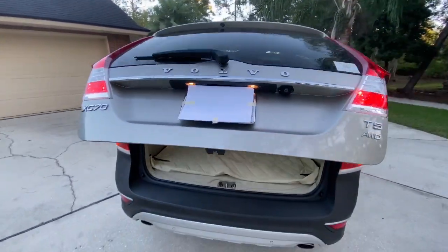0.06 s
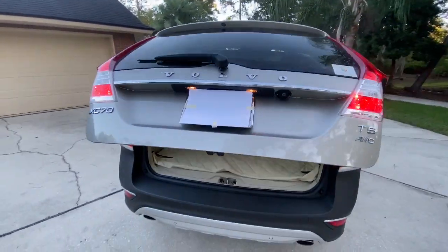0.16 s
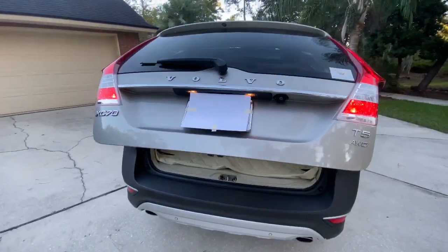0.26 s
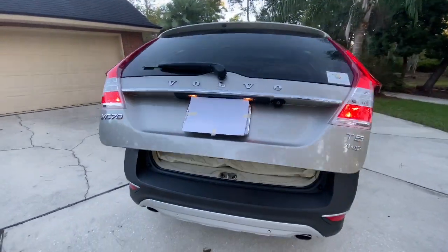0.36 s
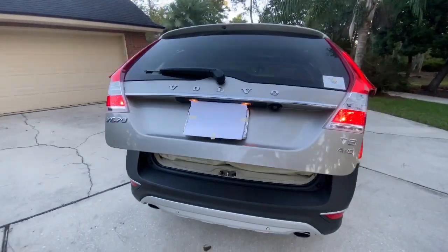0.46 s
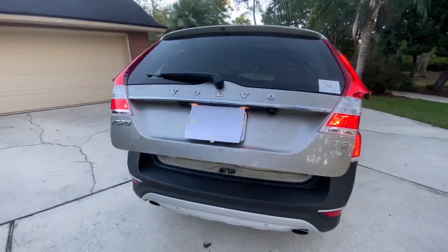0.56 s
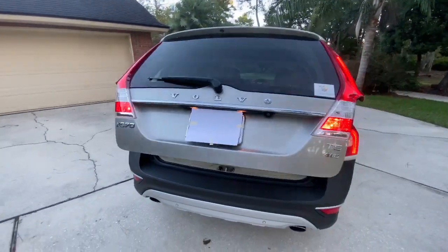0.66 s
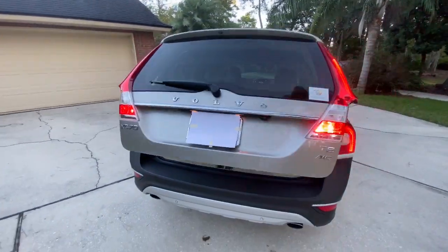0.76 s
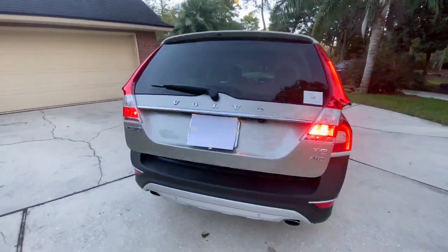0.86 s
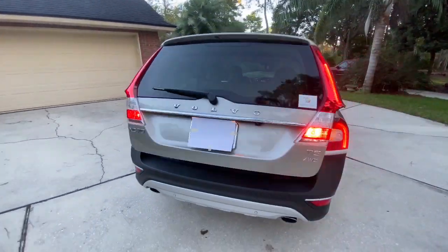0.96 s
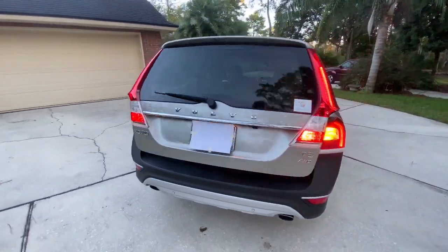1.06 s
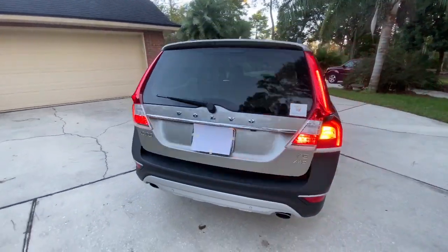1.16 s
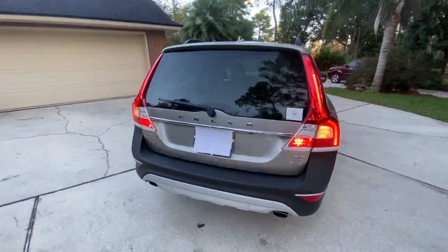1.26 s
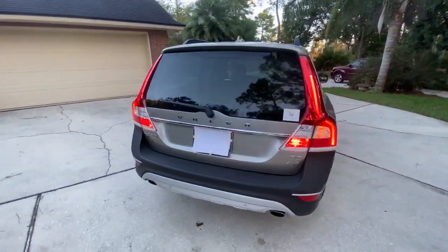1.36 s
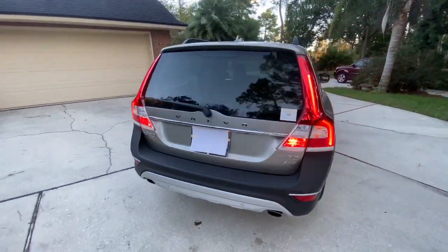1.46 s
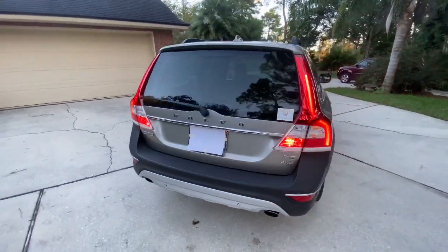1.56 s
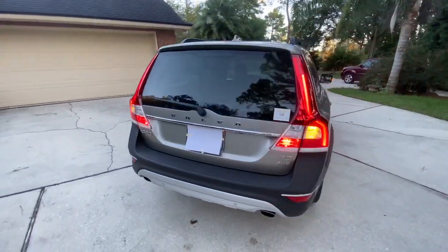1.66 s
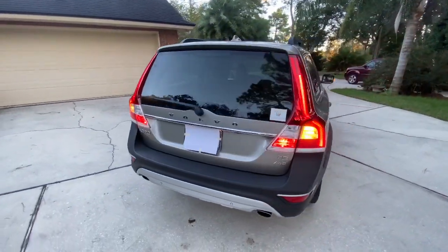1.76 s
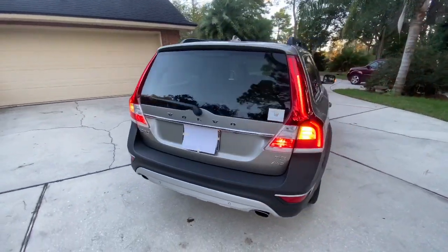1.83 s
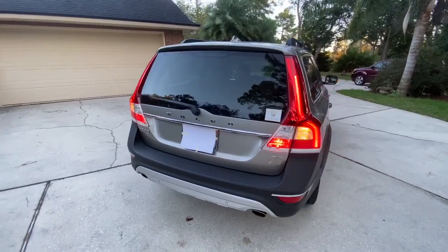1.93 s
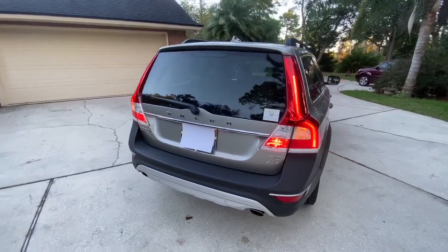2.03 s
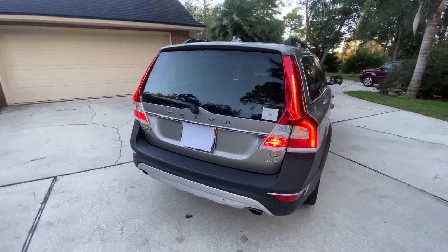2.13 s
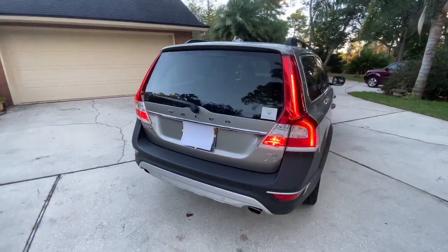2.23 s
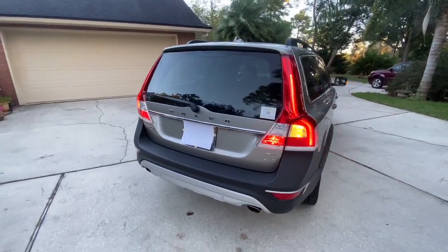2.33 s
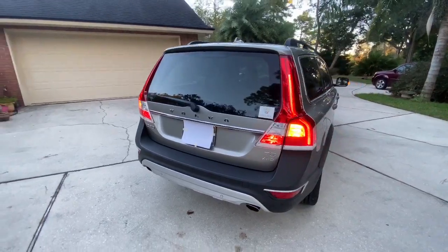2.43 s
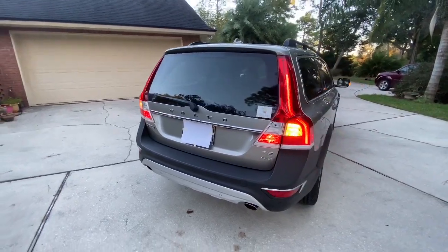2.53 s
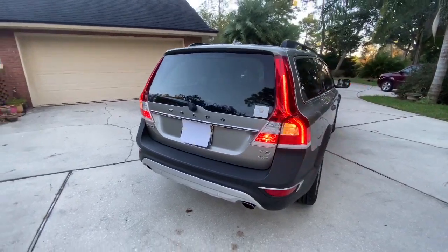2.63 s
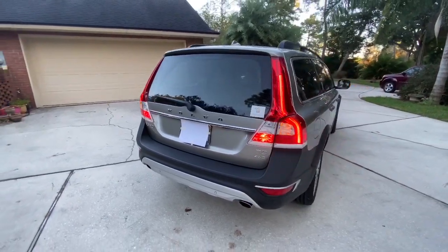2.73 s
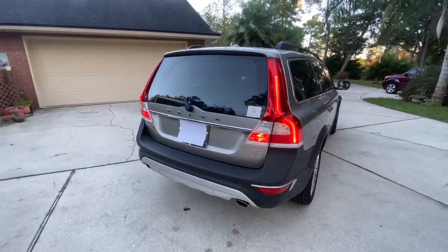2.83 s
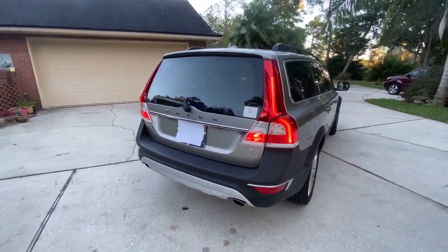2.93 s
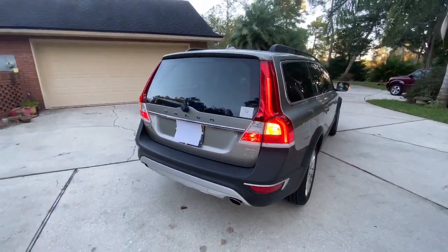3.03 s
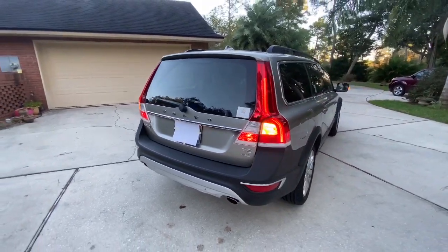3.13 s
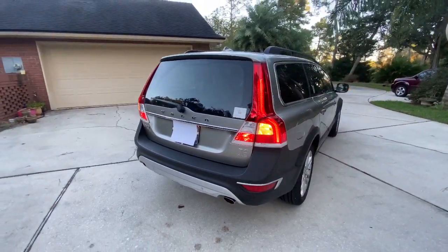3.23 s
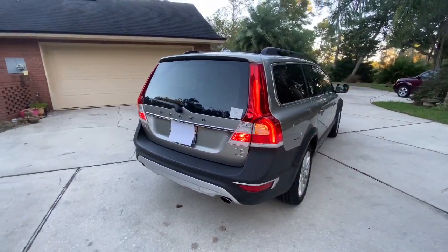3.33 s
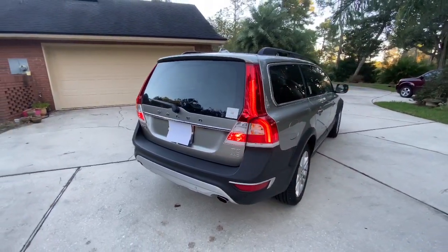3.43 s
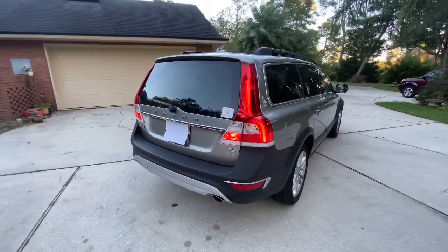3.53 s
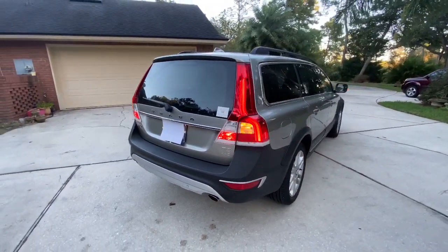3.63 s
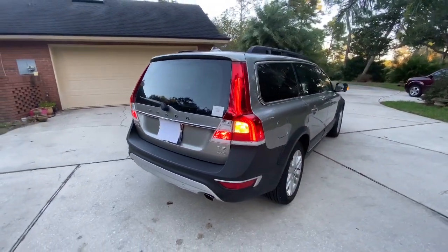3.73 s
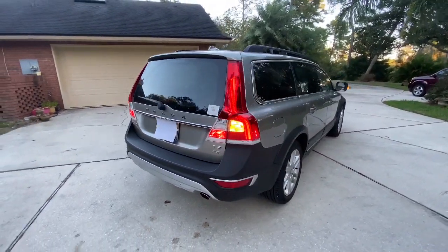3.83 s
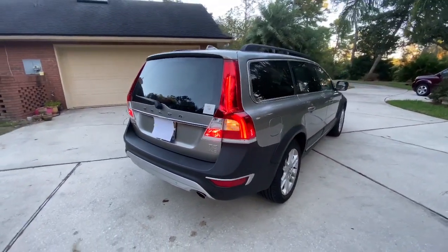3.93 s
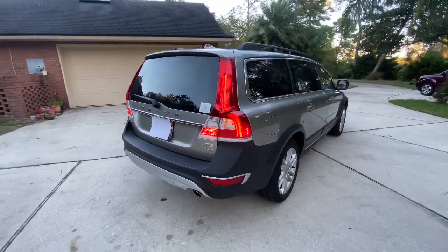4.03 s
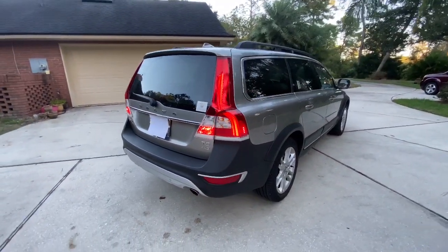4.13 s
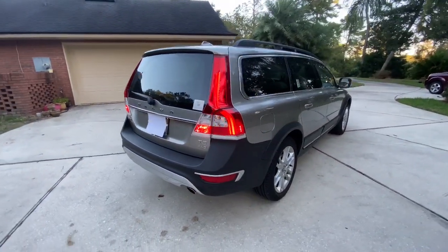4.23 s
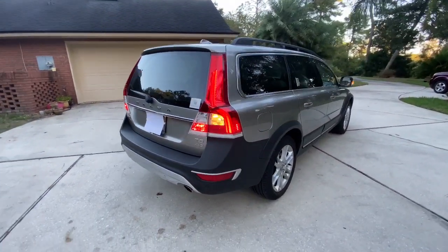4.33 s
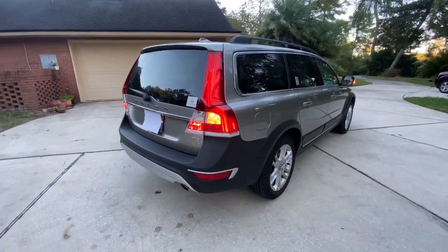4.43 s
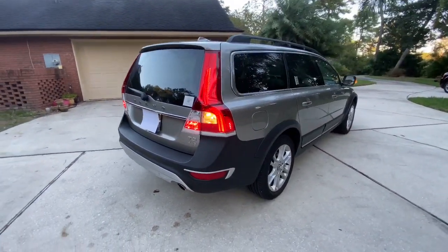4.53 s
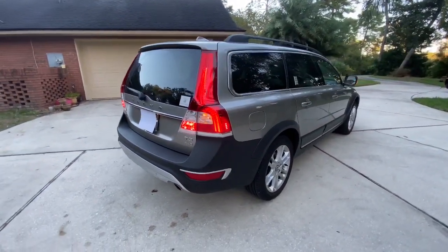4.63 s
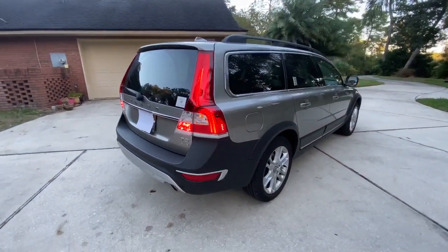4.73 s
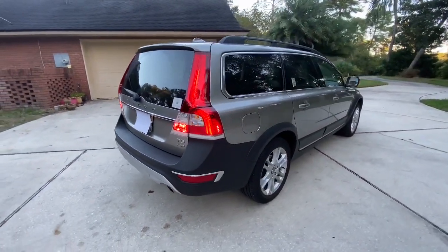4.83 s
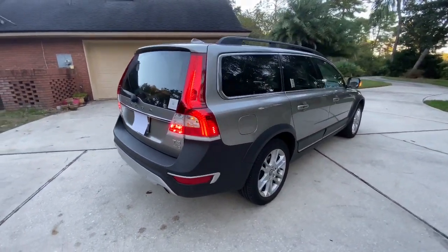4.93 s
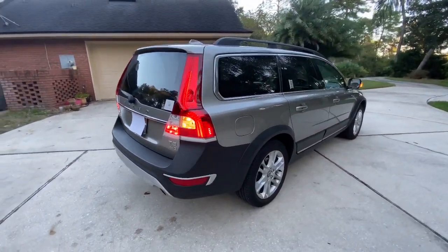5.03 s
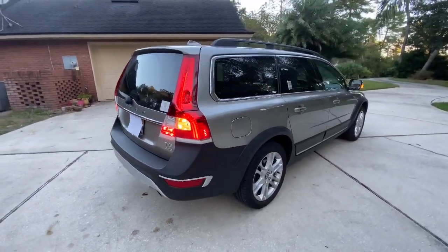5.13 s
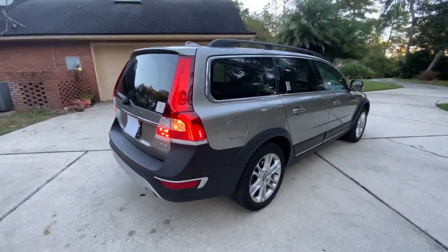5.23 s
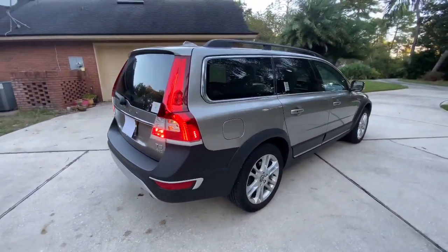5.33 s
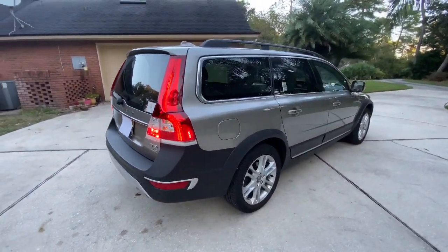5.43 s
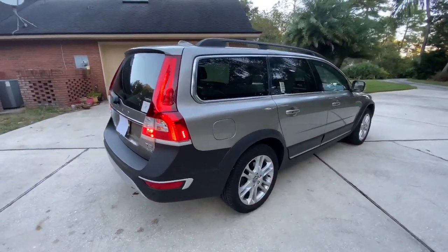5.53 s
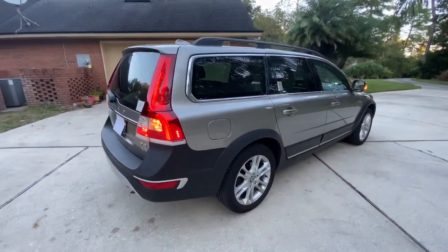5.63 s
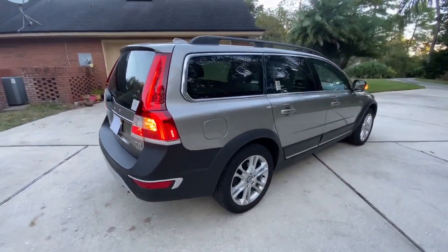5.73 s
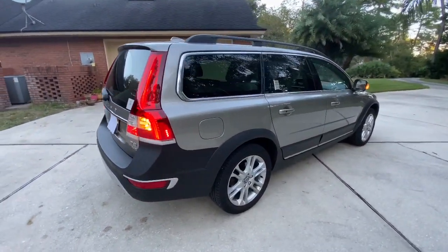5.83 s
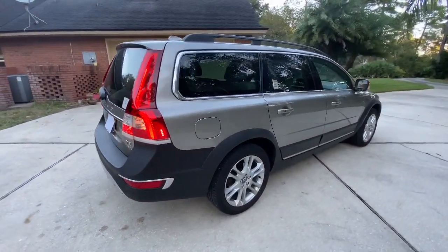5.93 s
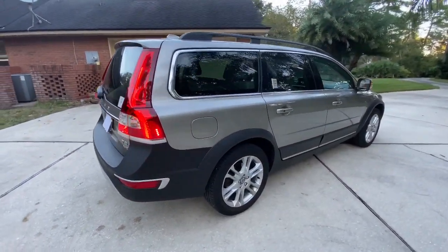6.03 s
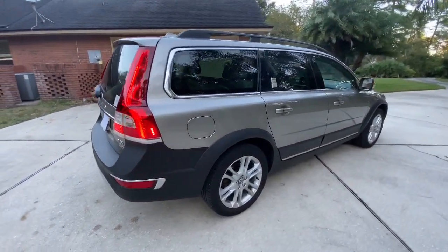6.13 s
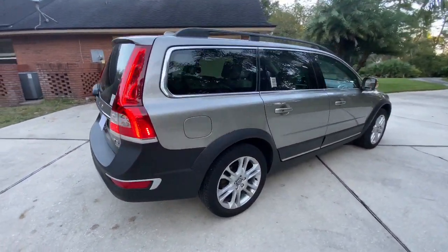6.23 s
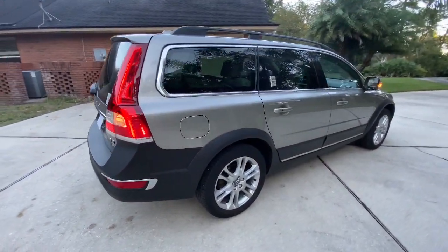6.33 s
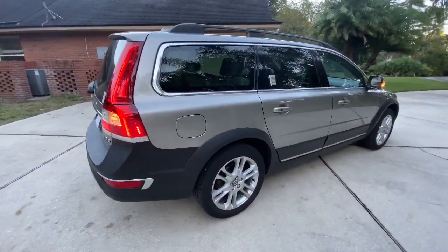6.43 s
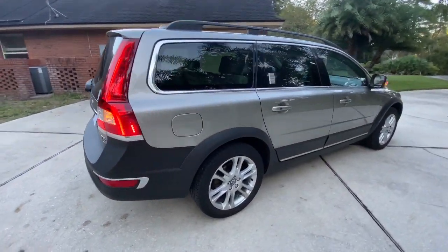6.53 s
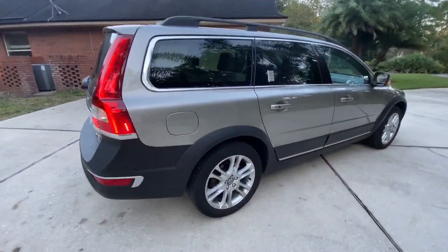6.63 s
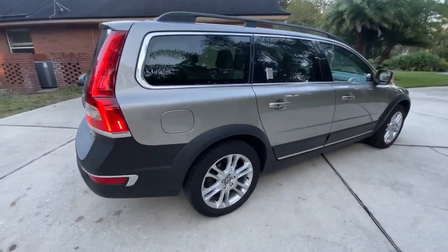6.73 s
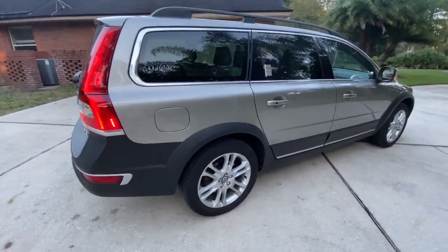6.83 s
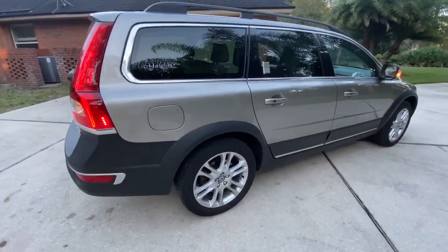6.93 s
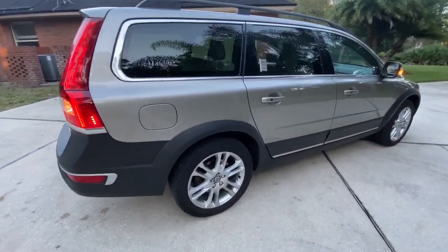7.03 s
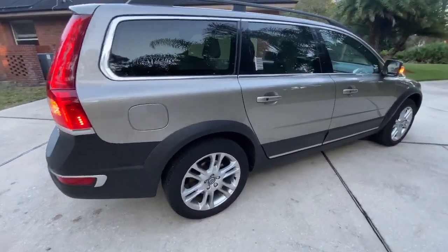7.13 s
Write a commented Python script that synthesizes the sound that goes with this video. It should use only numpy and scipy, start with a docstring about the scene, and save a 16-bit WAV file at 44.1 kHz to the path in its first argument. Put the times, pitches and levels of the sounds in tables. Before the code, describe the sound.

Motor whine rises faintly, a car's rear hatch thumps shut and rattles, then a low idle drone continues as engine hiss slowly grows brighter.

```python
"""A powered tailgate whines down and slams: motor and gear sines, then rattle noise and ringing modes.
Air trapped in the cabin booms at the slam and at the rebound.
The car idles on locked firing harmonics and shaped noise; along a walk round its flank the exhaust
drone shifts and the engine bay's hiss opens up. A thin electric whistle comes from the car.
Behind it all lies a hush of far traffic and leaves, with insects throbbing as bands of noise."""
import sys
import numpy as np
from scipy import signal
from scipy.fft import rfft, irfft
from scipy.io import wavfile

SR = 44100
rng = np.random.default_rng(int(sys.argv[2]) if len(sys.argv) > 2 else 0)


def dump_mix(stems):
    """Bounce the given channels to the path in sys.argv[1] as a 16-bit WAV at rate SR."""
    frames = np.atleast_2d(stems).T  # one column per channel
    limited = np.clip(frames, -1, 1)  # hard clip at full scale
    pcm = np.round(limited * 32767).astype(np.int16)
    wavfile.write(sys.argv[1], SR, pcm)


N = 316188
T = np.arange(N) / SR


def from_db(db):
    """Gain of a level in dB."""
    return 10 ** (np.asarray(db) / 20)


def rms_one(x):
    """Scale to unit power."""
    return x / np.sqrt(np.mean(x ** 2) + 1e-20)


def in_time(rows):
    """Columns of a table whose first column is time, as curves over the scene."""
    s, *columns = np.transpose(rows)
    return [np.interp(T, s, column) for column in columns]


def at_hz(points, hz):
    """Columns of a table whose first column is frequency, read on a log-frequency axis."""
    table_hz, *columns = np.transpose(points)
    return [np.interp(np.log(hz), np.log(table_hz), column) for column in columns]


def drift(rate_hz):
    """Slow random wander of spread 1: noise through two equal poles, made at every 40th sample."""
    r = np.exp(-2 * np.pi * rate_hz * 40 / SR)
    noise = rng.standard_normal(N // 40 + 4002)
    slow = signal.lfilter([1], [1, -2 * r, r * r], noise)[4000:]  # drop the filter's start-up
    slow = rms_one(slow - slow.mean())
    return np.interp(np.arange(N) / 40, np.arange(len(slow)), slow)


def ring(clicks, hz, t60_s):
    """A two-pole resonance: each unit click starts a dying sine of height 1."""
    r = from_db(-60 / (t60_s * SR))
    w = 2 * np.pi * hz / SR
    return signal.lfilter([0, np.sin(w)], [1, -2 * r * np.cos(w), r * r], clicks + 1e-18)


def tone(hz):
    """Sine of rms 1 at a fixed or moving pitch, from a random phase."""
    return np.sqrt(2) * np.sin(2 * np.pi * (np.cumsum(hz + 0 * T) / SR + rng.random()))


def whistling(hz, sway_hz):
    """Narrow noise of rms 1: a carrier whose two quadratures wander independently."""
    sway = drift(sway_hz), drift(sway_hz)
    phase = 2 * np.pi * np.cumsum(hz + 0 * T) / SR
    return rms_one(sway[0] * np.cos(phase) + sway[1] * np.sin(phase))


def port_noise(spectrum, ports, size=N):
    """Coloured noise at two microphone ports, as spectra; the mean of both has rms 1."""
    hz = np.maximum(np.fft.rfftfreq(size, 1 / SR), 1)
    alike, lead, balance_db = at_hz(ports, hz)
    alike = np.clip(alike, 0, 1)
    one, other = rfft(rng.standard_normal((2, size)))
    left = one * from_db(balance_db / 2)
    right = alike * np.exp(1j * lead) * one + np.sqrt(1 - alike ** 2) * other
    right = right * from_db(-balance_db / 2)
    pair = np.array([left, right]) * from_db(at_hz(spectrum, hz)[0])
    return hz, pair / np.sqrt(np.mean(irfft(pair.mean(axis=0), size) ** 2))


def in_bands(hz, pair, gain_db, size=N):
    """Overlapping bands half an octave apart, each with its own gain curve gain_db(centre_hz)."""
    out = 0
    for centre_hz in 30 * 2 ** np.arange(0, 9.6, .5):
        band = np.clip(1 - 2 * np.abs(np.log2(hz / centre_hz)), 0, 1)
        out = out + irfft(pair * band, size) * from_db(gain_db(centre_hz))
    return out


def from_ahead(x, balance_db):
    """A source that reaches the right port 7 samples earlier; balance is left minus right."""
    return np.array([np.roll(x, 7), x]) * from_db([[balance_db / 2], [-balance_db / 2]])


# Contacts of the slam, latch and bounces:
# [start_s, rattle_db, brightness_db_per_octave, frame_knock_db]
GATE_CONTACTS = [(1.230, -22, 0, -42), (1.235, -18.5, -1.5, -24), (1.242, -23.5, 0.6, -39),
                 (1.25, -9.5, 3.5, -19.5), (1.256, -26.5, 3, -28), (1.266, -27, -8, -23),
                 (1.273, -14.5, 2.5, -17.5), (1.2779, -11, 1.5, -8), (1.2868, -25.5, -5.5, -9),
                 (1.345, -44, 7.5, -24), (1.363, -40, -3, -23.5), (1.403, -53, 8, -29.5),
                 (1.425, -36.5, 1.5, -36), (1.443, -42.5, -7.5, -29), (1.484, -40, 1.2, -33),
                 (1.548, -43.5, 1, -41)]
# Colour of the rattle: [frequency_hz, relative_density_db]
RATTLE_COLOUR = [(150, -46), (250, 0.5), (494, -9.5), (598, -6), (1030, -8.5), (1140, -10.5), (2100, -11),
                 (3740, -27), (4450, -24), (8490, -41), (11600, -35), (15100, -48), (16200, -47)]
# How the rattle meets the two ports: [frequency_hz, likeness_0_to_1, right_lead_rad, left_minus_right_db]
RATTLE_PORTS = [(100, 0.82, -0.25, -11), (340, .9, 0.71, 2), (676, 0.47, 0.39, 7), (1100, 1, -0.6, -4),
                (2050, 0.27, -0.77, 10.5), (2940, 0.15, -0.23, -1.5), (4300, 0.13, 1, 1.5),
                (7000, 0.66, -2.3, 14), (10300, 1, -1.3, -8), (13000, 0.7, -1.2, 3)]
# Ringing sheet metal and latch: [pitch_hz, relative_level_db, t60_s]
PANEL_MODES = [(585, 0, .2), (618, -2, .15), (777, -2, .2), (822, -3, .15), (1124, 0, .15), (1233, -3, .12),
               (1480, -4, .15), (1660, -4, .12), (1883, -3, .1), (1930, -3, .12), (2200, -7, .08),
               (2449, -10, .1), (4480, -11, .08), (4646, -12, .08), (5360, -19, .05)]
# Knocking door frame: [pitch_hz, relative_level_db, t60_s]
FRAME_MODES = [(115, 3, 0.058), (164, 1, 0.2), (184, 7.5, 0.15), (292, 3.5, 0.035), (340, -5, 0.066),
               (406, -13, 0.24)]
SHUT_S = GATE_CONTACTS[0][0]
RATTLE_ATTACK_S, RATTLE_T60_S = .002, 0.059  # t60 at 1500 Hz
SHIVER_DB, SHIVER_T60_S = -21, 0.36          # faint long shiver of the body after each rattle


def slam():
    """Every contact rattles as dying noise, rings the sheet metal and knocks the frame."""
    size = SR
    start = round(SHUT_S * SR) - 100
    t = (np.arange(size) + start) / SR
    contact_s, rattle_db, tilt_db, knock_db = np.transpose(GATE_CONTACTS)
    age = t - contact_s[:, None]
    contact_at = np.round(contact_s * SR).astype(int) - start

    def struck(strengths, hz, t60_s):
        """One mode hit by all contacts."""
        clicks = np.zeros(size)
        clicks[contact_at] = strengths
        return ring(clicks, hz, t60_s)

    def envelope_db(hz):
        """Power sum of all contacts; the treble dies sooner."""
        decay_db = 60 * np.maximum(age, 0) * (hz / 1500) ** 0.15  # still to be divided by a t60
        rattle = from_db(-2 * decay_db / RATTLE_T60_S)  # the factor 2 gives power
        shiver = from_db(2 * (SHIVER_DB - decay_db / SHIVER_T60_S))
        attack = np.clip(age / RATTLE_ATTACK_S, 0, 1)
        hit = from_db(2 * (rattle_db + tilt_db * np.log2(hz / 1500)))[:, None]
        power = hit * (rattle + shiver) * attack
        return 10 * np.log10(power.sum(axis=0) + 1e-14)

    out = in_bands(*port_noise(RATTLE_COLOUR, RATTLE_PORTS, size=size), envelope_db, size=size)

    # each contact drives each panel mode by chance, separately at the two ports
    chance = rng.normal(0, 1, (len(contact_s), len(PANEL_MODES), 2))
    for k, (hz, db, t60_s) in enumerate(PANEL_MODES):
        strength = from_db(rattle_db + tilt_db * np.log2(hz / 1500) + db - 12.0)
        out[0] += struck(strength * chance[:, k, 0], hz, t60_s)
        out[1] += struck(from_db(-6) * strength * chance[:, k, 1], hz, t60_s)

    knock = sum(struck(from_db(knock_db + db - 11.5), hz, t60_s) for hz, db, t60_s in FRAME_MODES)
    out += knock * from_db([[.5], [-.5]])
    return np.pad(out, ((0, 0), (start, N - start - size)))


# The seal squeezes the cabin air at the slam and at the rebound: [start_s, push_db]
SEAL_SQUEEZES = [(1.2505, -11.5), (1.453, -26.5)]
# Trapped air booming: [pitch_hz, relative_level_db, t60_s]
CABIN_MODES = [(60.4, 0.5, 0.3), (82.8, -13, 0.3)]
SQUEEZE_S, SQUEEZE_HOLD_S = .012, 0.013  # build-up, then time at full swing


def cabin_boom():
    """The trapped air swings up while the seal closes, holds, then dies away."""
    out = 0
    for start_s, push_db in SEAL_SQUEEZES:
        age = np.maximum(T - start_s, 0)
        build_up = np.minimum(age / SQUEEZE_S, 1)
        dying_s = np.maximum(age - SQUEEZE_S - SQUEEZE_HOLD_S, 0)
        for hz, db, t60_s in CABIN_MODES:
            level_db = push_db + db - 60 * dying_s / t60_s
            out = out + from_db(level_db) * build_up * np.sin(2 * np.pi * hz * age)
    return out


# Tailgate drive: [time_s, motor_pitch_hz, motor_level_db, gear_level_db]
TAILGATE_DRIVE = [(0, 243, -55, -61), (.13, 243, -55, -67), (.2, 251, -54, -60), (.3, 261, -54, -60),
                  (.5, 271, -57, -61), (.62, 279, -62, -71), (1.0, 295, -71, -71), (1.2, 325, -74, -68)]
# Hiss of the drive: [centre_hz, width_hz, level_db, left_minus_right_db]
DRIVE_HISS_BANDS = [(448, 100, -60, -2), (568, 88, -61, 9.5), (1030, 180, -61, 6)]
HISS_FADE_S = 1  # spread of the hiss's bell-shaped fade from the start
GEAR_RATIO, UPPER_GEAR_RATIO = 2.39, 4.3  # gear pitches as multiples of the motor's
UPPER_GEAR_DB = -5  # against the first gear
GEAR_WAVER_DB = 1.2


def tailgate_drive():
    """Motor and gear sines rise and stop at first contact; hiss fades slowly from the start, on past the slam."""
    motor_hz, motor_db, gear_db = in_time(TAILGATE_DRIVE)
    motor_hz = motor_hz * (1 + 0.0033 * drift(21))
    motor = from_db(motor_db + 1.6 * drift(23)) * tone(motor_hz)
    gear = from_db(gear_db + GEAR_WAVER_DB * drift(6)) * tone(GEAR_RATIO * motor_hz)
    upper_db = gear_db + UPPER_GEAR_DB + GEAR_WAVER_DB * drift(4.5)
    upper_gear = from_db(upper_db) * tone(UPPER_GEAR_RATIO * motor_hz)
    hiss = sum(from_ahead(from_db(db) * whistling(hz, width_hz / 2), balance_db)
               for hz, width_hz, db, balance_db in DRIVE_HISS_BANDS)
    hiss_fade = np.exp(-.5 * (T / HISS_FADE_S) ** 2)
    return (motor + gear + upper_gear) * (T < SHUT_S) + hiss * hiss_fade


# Exhaust harmonics, multiples 1 to 8 of the firing rate: [level_at_shut_db,
# gain_before_shut_db_per_s (as the gate swings down), gain_after_shut_db_per_s (along the walk)]
EXHAUST_HARMONICS = [(-47.5, 3, -0.5), (-45.5, 3, -1.3), (-40.5, 2, -0.47), (-44.5, 4.5, -2),
                     (-48.5, -1, -0.4), (-61.5, -4, -1), (-60, 7, 1.03), (-65, -4, 0.5)]
# Belt-driven units: [pitch_hz, level_db]
BELT_HUMS = [(77, -53.5), (213, -63), (291, -66.5)]
FIRING_HZ = 29.93
PIPE_SPREAD_RAD = 1.9  # the pipe shifts the phase of harmonic k by this times k squared


def exhaust():
    """Firing harmonics locked to one wavering phase, and accessory hums; also returns that phase."""
    firing_hz = FIRING_HZ * (1 + .002 * drift(2))
    firing = 2 * np.pi * (np.cumsum(firing_hz) / SR + rng.random())
    since_shut = T - SHUT_S
    drone = 0
    for k, (shut_db, before_slope, after_slope) in enumerate(EXHAUST_HARMONICS, 1):
        level_db = shut_db + before_slope * np.minimum(since_shut, 0)
        level_db = level_db + after_slope * np.maximum(since_shut, 0) + 0.59 * drift(6.1)
        harmonic = np.sqrt(2) * np.cos(k * firing + PIPE_SPREAD_RAD * k * k)
        drone = drone + from_db(level_db) * harmonic
    hums = sum(from_db(db + 2.0 * drift(1.8)) * tone(hz) for hz, db in BELT_HUMS)
    return drone + hums, firing


# Reflections from the ground, car flank and house wall: [delay_s, level_db]
NEAR_ECHOES = [(.0031, -14.5), (.0087, -14.5), (0.0173, -13)]


def with_echoes(x):
    """Near reflections whose delays slide as the listener walks: slowly moving ripples in the hiss."""
    out = x
    for delay_s, db in NEAR_ECHOES:
        source_time = T - delay_s * (1 + 0.0299 * drift(0.293))
        out = out + from_db(db) * np.array([np.interp(source_time, T, side) for side in x])
    return out


# Levels along the walk round the flank: [time_s, rumble_db, engine_bay_db]
WALK_LEVELS = [(0, -51.5, -55.5), (1.2, -45.5, -54), (1.8, -46, -55), (3.3, -49.5, -54), (4.6, -46.5, -51),
               (5.2, -47.5, -50), (6.3, -46, -49), (7.17, -44, -47.5)]
# Colour of the low rumble: [frequency_hz, relative_density_db]
RUMBLE_COLOUR = [(20, -32), (38, -15), (55, 8.5), (75, 2.5), (110, 1), (160, -2), (220, -5), (330, -14.5),
                 (500, -16.5), (900, -53)]
# Colour of the engine bay's hiss: [frequency_hz, relative_density_db]
BAY_COLOUR = [(210, 0.5), (350, -0.5), (506, -21.5), (768, -0.5), (1150, -4.5), (1580, -0.5), (1740, -6.5),
              (2250, -11), (3150, -21), (6390, -18), (9390, -32.5), (11800, -24.5), (13200, -47),
              (14700, -29), (16200, -24)]
# How steady noise, the garden's too, meets the two ports:
# [frequency_hz, likeness_0_to_1, right_lead_rad, left_minus_right_db]
STEADY_PORTS = [(100, 0.9, 0.5, 0), (346, 0.93, 0.5, 1), (630, 0.8, 1.76, 3), (960, 0.55, -1.13, -2.5),
                (1760, 0.61, 4, 7.5), (2680, 0, -5.5, 2), (3300, 0, -1, -2.5), (5300, 0.3, 2, 3.5),
                (6840, 0.7, 1.42, 0), (11100, 0.7, 1.5, -0.5)]
# A whine from the bay: [time_s, level_db]
BAY_WHINE = [(0, -67), (1.8, -75), (2.5, -62), (3.5, -69), (3.8, -62), (4.7, -61), (5.3, -61.5),
             (5.8, -52.5), (6.15, -62), (6.4, -51), (6.7, -61), (7.17, -58)]
WHINE_HZ, WHINE_SWAY_HZ = 1581, 27  # centre, and rate of its random sway


def engine_noise(firing):
    """Low rumble, a whine, and bay hiss that ticks with the firings and brightens as it grows."""
    rumble_db, bay_db = in_time(WALK_LEVELS)
    low = port_noise(RUMBLE_COLOUR, STEADY_PORTS)[1]
    rumble = from_db(rumble_db + 0.79 * drift(4.1)) * irfft(low, N)

    tilt_db = 0.41 * (bay_db + 53.5)  # dB per octave: the car body shadows the treble most
    tick_db = 1.17 * np.cos(firing) + 0.2 * np.cos(2 * firing)

    def bay_gain_db(hz):
        """Level of one band, with its own slow and fast wander."""
        shadow_db = tilt_db * np.log2(max(hz, 600) / 1500)
        return bay_db + shadow_db + tick_db + 0.74 * drift(1.8) + 1.05 * drift(18)

    bay = in_bands(*port_noise(BAY_COLOUR, STEADY_PORTS), bay_gain_db)
    whine = from_db(in_time(BAY_WHINE)[0]) * whistling(WHINE_HZ, WHINE_SWAY_HZ)
    return rumble + with_echoes(bay) + from_ahead(whine, 8.4)


# Narrow bands in the hiss: [centre_hz, width_hz, peak_level_db, loudest_at_s]
HISS_SWELLS = [(898, 20, -62, 3.84), (881, 230, -58.5, 5.8), (1486, 99, -60.5, 4.04),
               (1810, 110, -58.5, 5.25), (1420, 100, -59, 6.2), (2286, 180, -59.5, 6.7),
               (2970, 120, -61.5, 6.8), (3560, 120, -64.5, 6.1), (1027, 110, -62, 6.7)]
SWELL_S, SWELL_BALANCE_DB = 1, 1.5  # spread of each bell-shaped swell; left minus right


def hiss_swells():
    """Narrow noise bands in the hiss, each swelling once and fading."""
    swells = sum(from_db(db) * np.exp(-.5 * ((T - peak_s) / SWELL_S) ** 2) * whistling(hz, width_hz / 2)
                 for hz, width_hz, db, peak_s in HISS_SWELLS)
    return from_ahead(swells, SWELL_BALANCE_DB)


# The whistle comes and goes: [time_s, level_db]
WHISTLE_LEVELS = [(0, -66.5), (.3, -67.5), (.45, -91), (.6, -76.5), (1.2, -68), (1.5, -76), (1.62, -77),
                  (1.82, -74), (1.92, -93), (2.1, -69), (2.28, -78.5), (2.38, -66), (2.6, -68), (2.9, -80),
                  (3.05, -66.5), (3.5, -80), (4.1, -78), (4.45, -72), (4.85, -86), (5.5, -76), (7.17, -72)]
WHISTLE_HZ = 10004
WHISTLE_WAVER_DB_PER_S = 0.56  # it wavers more as the walk goes on


def electric_whistle():
    """A thin switching tone with slightly wandering pitch, one sample earlier at the right port."""
    level_db = in_time(WHISTLE_LEVELS)[0] + WHISTLE_WAVER_DB_PER_S * T * drift(3)
    whistle = from_db(level_db) * tone(WHISTLE_HZ + 1.0 * drift(3))
    return np.array([whistle, np.roll(whistle, -1)])


# Colour of far traffic and leaves: [frequency_hz, relative_density_db]
GARDEN_COLOUR = [(180, -6), (300, -9), (547, -6), (585, -1), (817, -7.5), (1540, -17), (1820, -16.5),
                 (5380, -19.5), (9180, -87), (10300, -25), (13000, -68), (14400, -56), (16200, -47)]
# Insects: [centre_hz, width_hz, mid_throb_level_db, throbs_per_s, fade_db_per_s (as the walk leaves them)]
INSECT_BANDS = [(3684, 2900, -64, 6.1, -0.5), (5440, 380, -67, 8.3, -0.5)]
GARDEN_DB = -58


def garden():
    """A gently wandering noise hush, and insects as noise bands throbbing in level, mostly on the left."""
    hush = irfft(port_noise(GARDEN_COLOUR, STEADY_PORTS)[1], N)
    out = from_db(GARDEN_DB + 0.98 * drift(2.4)) * hush
    for hz, width_hz, db, throbs_per_s, fade_db_per_s in INSECT_BANDS:
        throb_db = 4.6 * np.sin(2 * np.pi * throbs_per_s * T + 1.2 * drift(1.0))
        level = from_db(throb_db + fade_db_per_s * T + db)
        out += level * np.array([whistling(hz, width_hz / 2), 0.1 * whistling(hz, width_hz / 2)])
    return out


def scene():
    """All sources at the two ports."""
    tailgate = slam() + cabin_boom() + tailgate_drive()
    drone, firing = exhaust()
    engine = drone * from_db([[.2], [-.2]]) + engine_noise(firing) + hiss_swells()
    return tailgate + engine + electric_whistle() + garden()


CUTOFF_HZ = 16300  # where the top is fully cut


def record(dry):
    """The microphone drops the deepest bass, peaks are rounded, the top is cut."""
    bass_cut = signal.butter(4, 24, "highpass", fs=SR, output="sos")
    top_cut = signal.cheby2(12, 70, CUTOFF_HZ, fs=SR, output="sos")
    heard = signal.sosfilt(bass_cut, dry)
    rounded = 1.332 * np.tanh(heard / 1.274)
    return signal.sosfilt(top_cut, rounded)


dry = scene()
out = record(dry)
dump_mix(out)
```